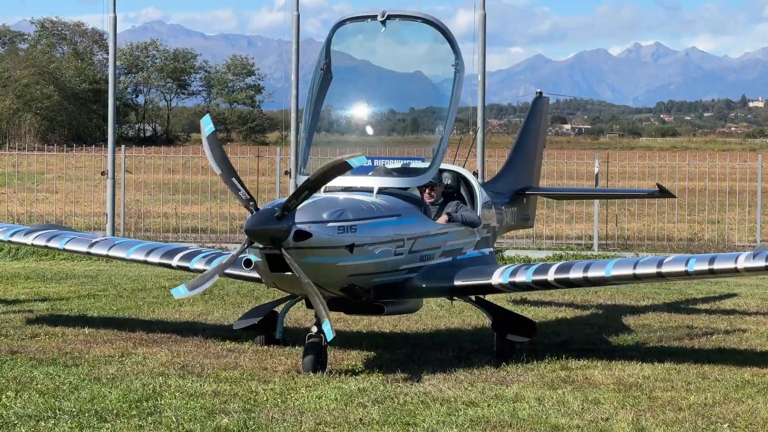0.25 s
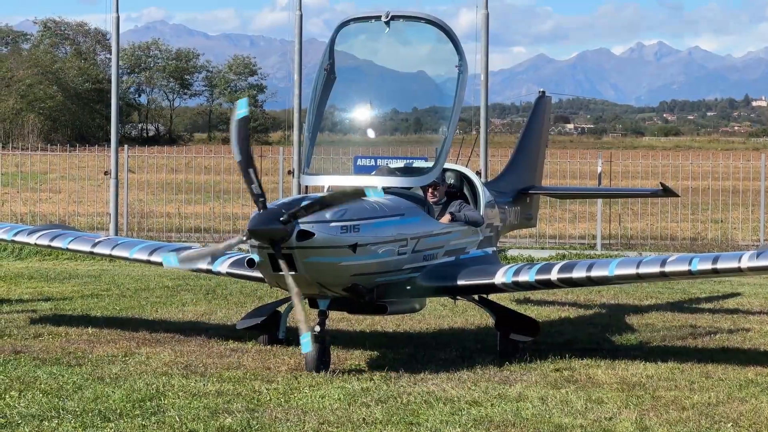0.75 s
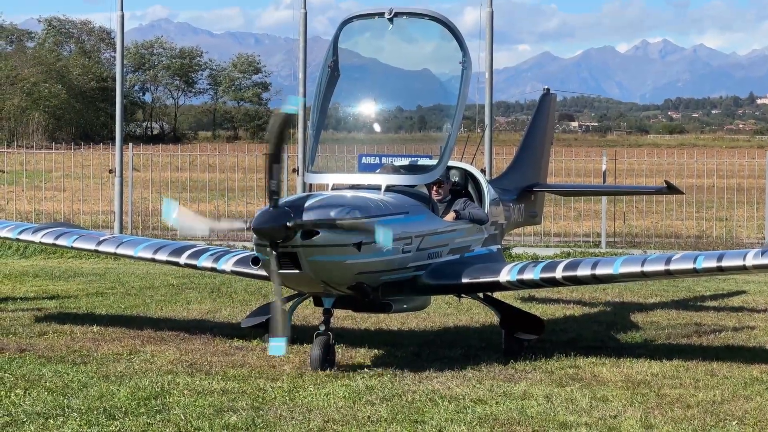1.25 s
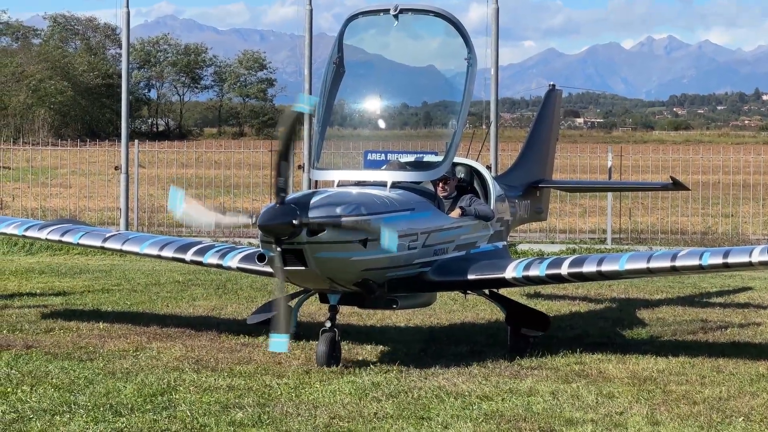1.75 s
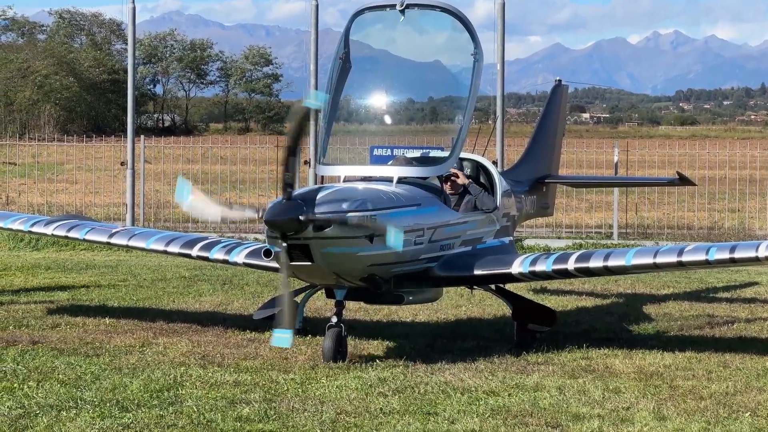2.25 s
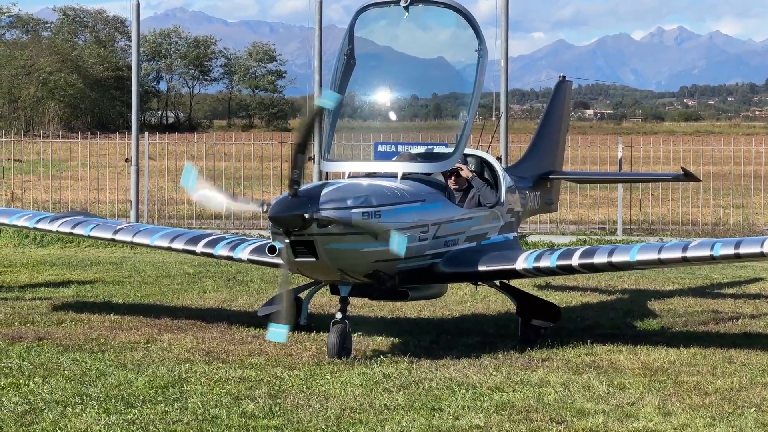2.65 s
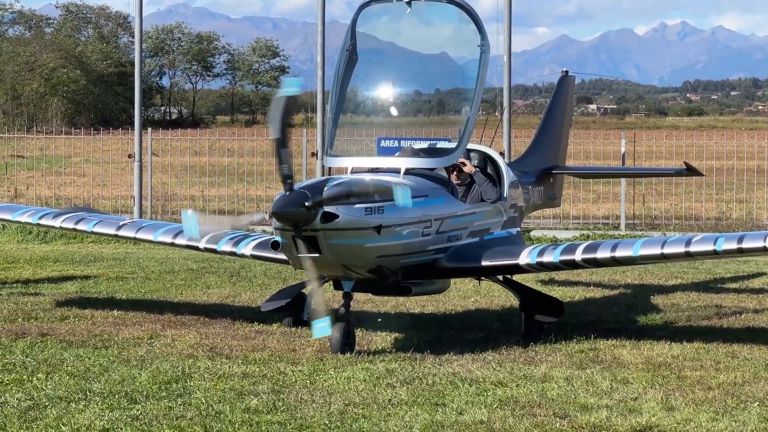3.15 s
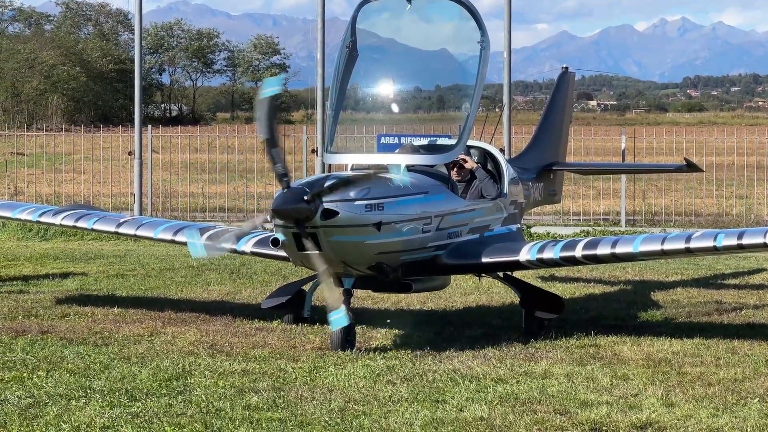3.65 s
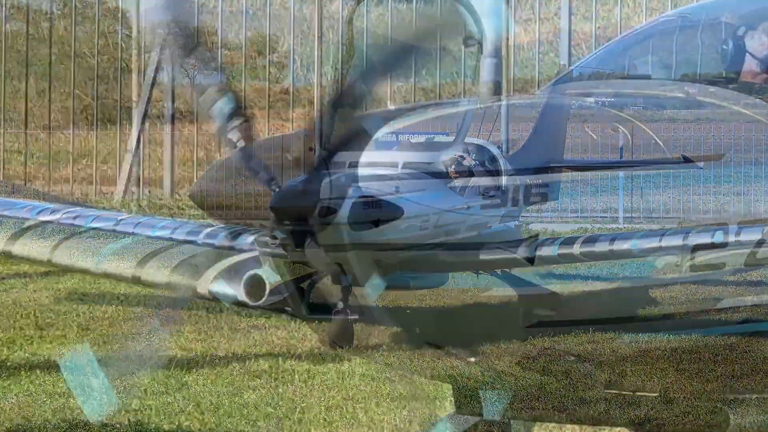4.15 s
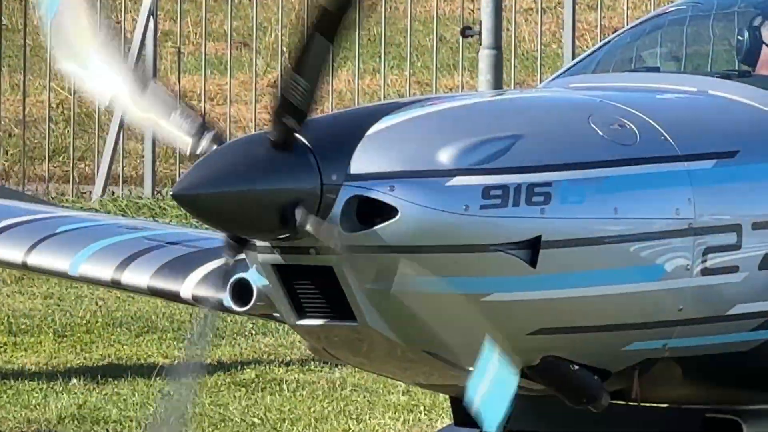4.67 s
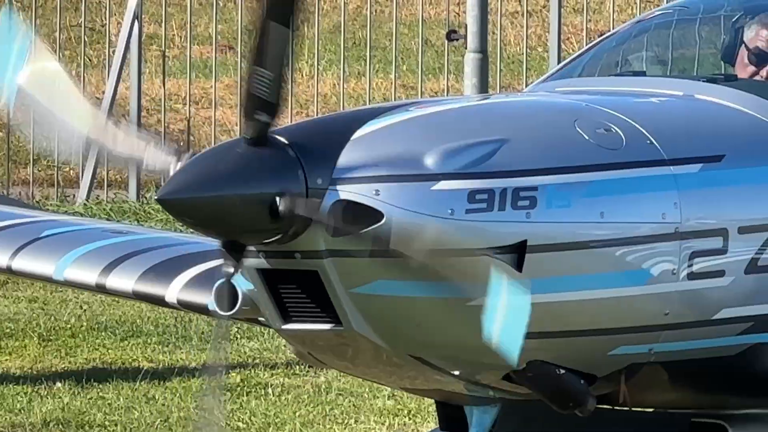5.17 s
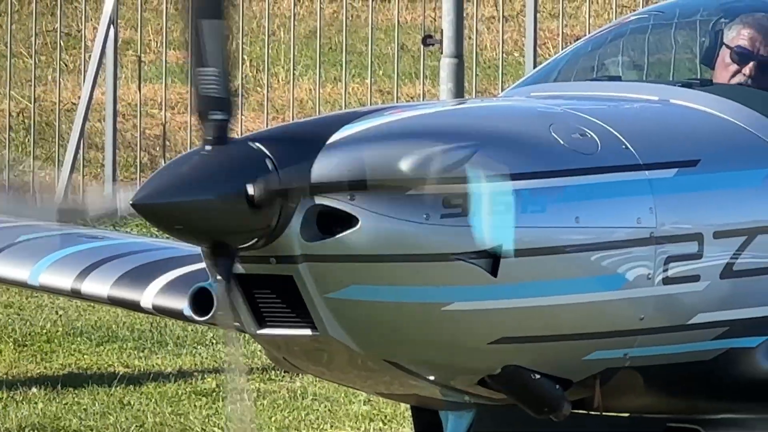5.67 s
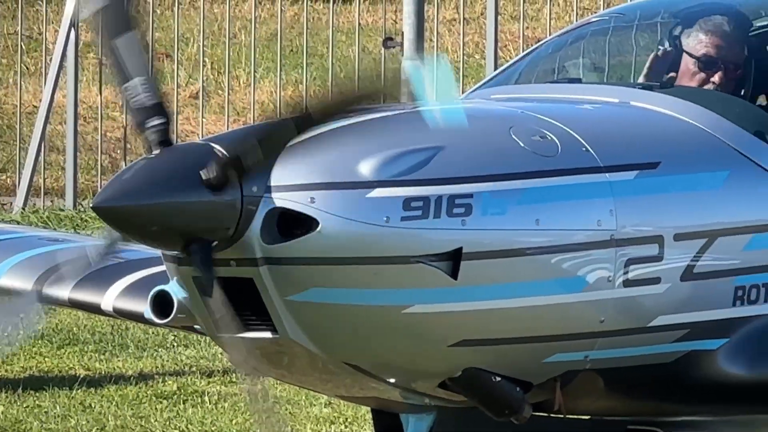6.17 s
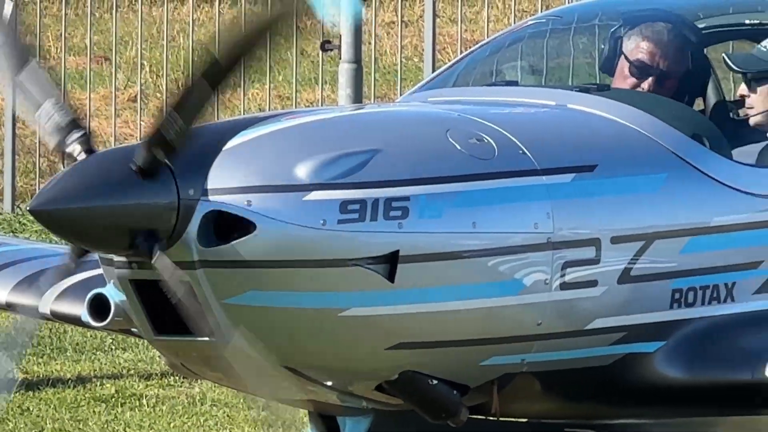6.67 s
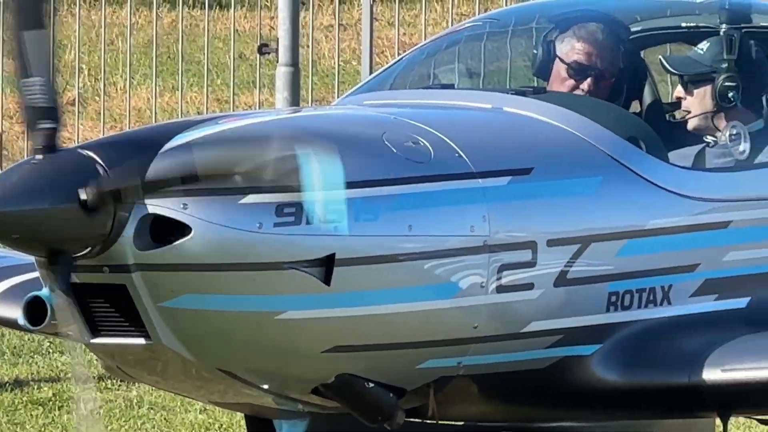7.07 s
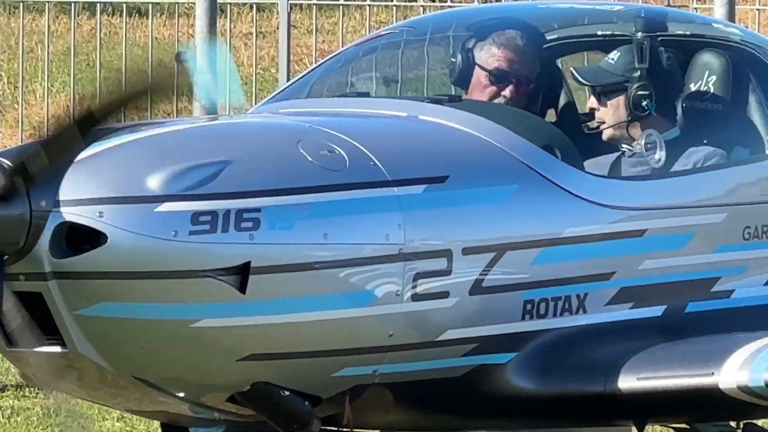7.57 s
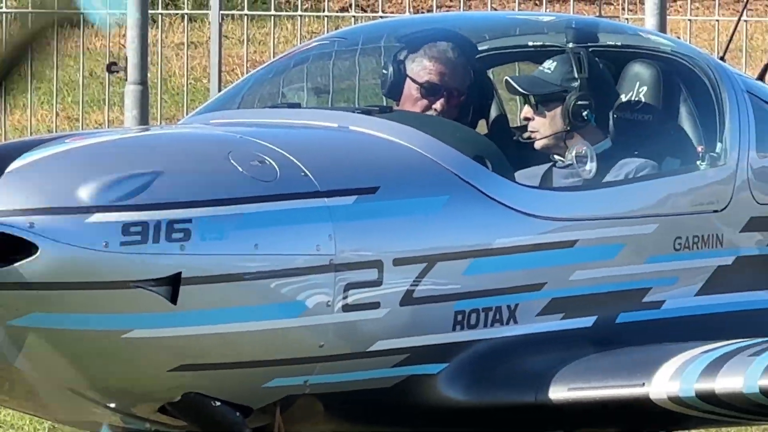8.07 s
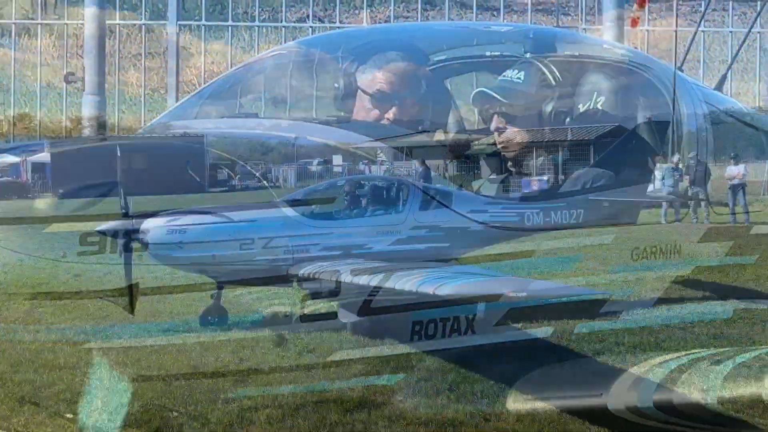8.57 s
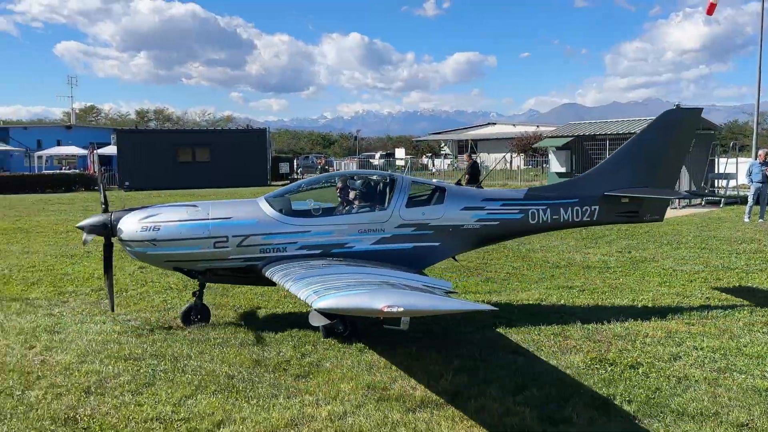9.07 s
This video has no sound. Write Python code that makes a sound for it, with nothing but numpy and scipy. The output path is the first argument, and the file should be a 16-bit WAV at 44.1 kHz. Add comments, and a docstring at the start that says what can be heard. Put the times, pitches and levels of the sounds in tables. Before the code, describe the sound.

Over a faint low outdoor rumble, a light aircraft's starter whirrs and turns the engine with four soft chuffs. At about 0.5 seconds sharp metallic clacks and a wavering starter grind break in; the first firings follow at 0.7 with loud gear clatter and a low shudder. The exhaust booms and coughs, the starter stops near 1.3, and the engine rises to a fast, throbbing idle with propeller thrum. From 1.5 the propeller's draught buffets the microphone. The level eases slightly around 2.5, with an occasional uneven beat. Between 3.9 and 4.4 the sound blends into a slower, lower idle heard close to the nose, with ticking valves, a rattling gearbox, scattered light knocks and less wind. Between 8.4 and 8.9 it blends into a faster, higher, slightly louder idle from the side, with propeller swish, creeping up in speed until the end at about 9.3.

```python
"""Light aircraft starting and idling

On a grass airfield a four-cylinder engine is cranked, catches with a clatter and settles to a fast
idle. The sound dissolves to a slow idle by the cowling, where the gearbox rattles, then to a faster
idle from the side. Periodic exhaust pulses and a geared four-blade propeller give line spectra that
follow the engine speed; turbulence and impacts give broadband noise."""
import sys
import numpy as np
from scipy import signal
from scipy.fft import rfft, irfft, next_fast_len
from scipy.io import wavfile
from scipy.ndimage import map_coordinates

SR = 44100
rng = np.random.default_rng(int(sys.argv[2]) if len(sys.argv) > 2 else 0)


def master(y):
    """Save y as 16-bit WAV."""
    cut = np.clip(np.atleast_2d(y).T, -1, 1)
    pcm = np.round(cut * 32767)  # scale
    wavfile.write(sys.argv[1], SR, pcm.astype(np.int16))


N = 411453
T = np.arange(N) / SR

# Noise spectra of the open field and the start: f/Hz, relative spectral density/dB
FIELD_SPECTRUM = [(20, -6), (70, 3), (130, -4.5), (300, -11.5), (440, -18.5), (600, -12.5), (850, -16.5),
                  (1500, -24.5), (3000, -30), (6000, -45), (12000, -55)]
CHUFF_SPECTRUM = [(200, -24), (440, -10), (780, 3.5), (1100, -9), (2500, -13.5), (4500, -20), (7000, -27),
                  (11000, -51), (16000, -60)]
CLATTER_SPECTRUM = [(240, -36), (400, -1), (715, -4.5), (809, 0), (1710, -5.5), (1990, -5), (2920, -10),
                    (6280, -15.5), (7670, -18.5), (8150, -29), (9070, -24.5), (15500, -29)]
TOOTH_SPECTRUM = [(120, -25), (230, 10), (600, -26), (900, -2), (1400, -13), (3200, -4), (4500, -11),
                  (6200, -7), (9200, -18), (11200, -26), (15500, -22)]
AIRFRAME_SPECTRUM = [(25, -36), (55, -6), (90, 2.5), (140, -2.5), (185, -9), (250, -3.5), (330, -8),
                     (460, -19), (600, -30), (1000, -61), (3000, -100)]
# Resonances of the metal parts: f/Hz, bandwidth/Hz, level/dB
STARTER_MODES = [(1990, 92, 1), (2155, 170, 2)]
GEARCASE_MODES = [(886, 130, 4.5), (1410, 120, -5), (1890, 110, 3), (2200, 150, -2.5), (3200, 150, 2),
                  (4010, 90, -2), (5440, 180, -5), (6080, 130, -5)]
BACKLASH_MODES = [(1900, 280, 9), (2280, 440, 5.5), (3280, 700, -1)]
# Tooth impacts, first firings, weak or strong firings, hardest gearbox knocks: t/s, relative level/dB
TOOTH_IMPACTS = [(0.5374, -7), (0.6514, -4.5), (0.6664, -28), (0.6896, -8), (0.7647, -10.5), (0.8314, -11),
                 (0.8785, -7), (0.9294, -11.5)]
FIRST_FIRINGS = [(0.707, -1), (0.731, 1.5), (0.747, -6), (0.769, -8), (0.892, 1.5)]
UNEVEN_FIRINGS = [(2.61, -3.5), (3.505, -12), (3.555, 3.5), (5.445, 0.5), (6.242, 4.5), (6.6, -4),
                  (7.31, 1.5)]
HARD_KNOCKS = [(4.513, -28), (4.58, -31), (4.782, -31), (4.922, -31), (5.331, -31), (5.81, -29),
               (6.088, -31), (6.144, -30), (6.411, -29), (7.034, -31), (7.561, -31), (7.902, -31),
               (7.972, -31)]
# Responses of the exhaust system: f/Hz, level/dB
SILENCER_RESPONSE = [(60, -33), (140, -16), (190, -1.5), (220, -1), (255, -0.5), (300, -18.5), (700, -66)]
PIPE_RESPONSE = [(20, -16), (38, -24), (56, 2.5), (90, 4), (130, -1), (220, -3), (300, -13.5), (450, -24),
                 (900, -47), (4000, -100)]
# Engine speed at each listening position: t/s, firing rate/Hz
FRONT_RATE = [(0.7, 24), (1.1, 48), (1.3, 68), (1.65, 75.8), (2.4, 79), (4.3, 81.3)]
COWL_RATE = [(4.4, 59.57), (5.5, 59.15), (8.4, 59.54)]
SIDE_RATE = [(8.4, 83.44), (9.15, 88.1), (9.33, 89)]
# Exhaust lines: multiple of the firing rate (sounded at the nearest quarter), level/dB
FRONT_LINES = [(1, 2), (1.25, -19), (2, -8.5), (2.75, -29), (3, -19.5), (5, -28.5)]
COWL_LINES = [(0.998, 0.5), (1.75, -19), (2, -6.5), (2.75, -19.5), (3, -17), (3.999, -21.5), (5, -24.5)]
SIDE_LINES = [(0.5, -30), (0.75, -32), (1, 0.5), (1.25, -18), (1.75, -17), (2, -8), (2.75, -44), (3, -20),
              (4, -25.5)]
# Burble of uneven firing: listening position, relative level/dB
BURBLE_DB = {"front": -20, "cowl": -18.5, "side": -22}
# Propeller lines: multiple of the blade-passing rate, level/dB
BLADE_LINES = [(1, 2.5), (2, -1), (3, 3.5), (4, -2.5)]
# Machinery noise and propeller wash: f/Hz, relative spectral density/dB
FRONT_WASH = [(180, 0), (300, -0.5), (430, -5.5), (900, -2.5), (1060, -7), (1450, -7), (2200, -14),
              (3500, -16.5), (4700, -24), (6500, -24.5), (9200, -28.5), (11000, -33.5), (15500, -28)]
COWL_WASH = [(180, -6.5), (300, -4.5), (400, -6.5), (830, -2.5), (1000, -5.5), (1650, -11), (2300, -14.5),
             (2700, -16.5), (3700, -18.5), (4700, -25.5), (6700, -27), (9200, -33), (11000, -36),
             (15500, -31)]
SIDE_WASH = [(180, -28), (330, -3.5), (450, -7), (650, -5), (1000, -1.5), (1500, -7), (2400, -14.5),
             (3000, -10.5), (4200, -22), (5500, -18), (7500, -21.5), (9200, -29.5), (11000, -29.5),
             (15500, -25)]
# Propeller draught at the microphone ports: f/Hz, relative spectral density/dB
DRAUGHT_SPECTRUM = [(20, -25), (45, -5), (75, 9), (160, -3), (260, -11), (450, -42), (1500, -84)]
# Sum of the two ports, which are in antiphase near 8 kHz: f/Hz, gain/dB
MID_RESPONSE = [(20, -20), (36, -2), (52, 1), (7000, 1), (7650, -5), (8000, -42), (8450, -39), (8800, 0),
                (9300, 3), (11000, -5)]
# Stereo width, nearly mono in bass and midrange, wide near 8 kHz and in the top treble: f/Hz, side gain/dB
STEREO_WIDTH = [(60, -28), (200, -21.5), (500, -22), (1000, -21.5), (2000, -57), (3300, -14.5),
                (5500, -39.5), (7000, -10), (8200, 4), (9400, 3), (11500, -33), (14000, -6)]
# Dissolves from front to cowling and from cowling to side: start t/s, end t/s
CROSSFADES = [(3.85, 4.42), (8.35, 8.94)]

STARTER_ON_S, STARTER_OFF_S = 0.525, 1.287
REDUCTION_RATIO = 2.543  # crank turns per propeller turn


def amp(db):
    """Amplitude ratio of a level in decibels."""
    return 10 ** (np.asarray(db) / 20)


def unit(x):
    """Normalisation to rms 1."""
    return x / np.sqrt(np.mean(x ** 2) + 1e-20)


def gain(spectrum, hz):
    """Amplitude of a spectrum, interpolated on log-log axes."""
    f, db = np.transpose(spectrum)
    return amp(np.interp(np.log(hz + 1), np.log(f + 1), db))


def curve(rows):
    """Linear interpolation of (t, value) rows at every sample."""
    return np.interp(T, *np.transpose(rows))


def ramp(start, end):
    """Linear rise from 0 to 1 between two times."""
    return np.clip((T - start) / max(end - start, 1 / SR), 0, 1)


def held(start, rise, end, fall):
    """Trapezoidal envelope; times in seconds."""
    return ramp(start, start + rise) * (1 - ramp(end, end + fall))


def bump(at_s, width_s):
    """Gaussian envelope of peak 1."""
    return np.exp(-((T - at_s) / width_s) ** 2)


def wobble(rate):
    """Smooth random modulation, rate knots a second."""
    return map_coordinates(rng.standard_normal(int(N * rate / SR) + 4), [T * rate])


def filtered(x, response):
    """Linear filtering by multiplication of spectra."""
    size = next_fast_len(N + SR // 4, True)
    return irfft(rfft(x, size) * response(np.fft.rfftfreq(size, 1 / SR)), size)[..., :N]


def noise(spectrum):
    """Coloured mid and side noise of rms 1."""
    return unit(filtered(rng.standard_normal((2, N)), lambda hz: gain(spectrum, hz)))


def ringing(modes):
    """Lorentzian resonances excited by noise; mid and side, rms 1."""
    body = lambda f: sum(amp(db) / (1 + ((f - hz) / (width / 2)) ** 2) for hz, width, db in modes)
    return unit(filtered(rng.standard_normal((2, N)), body))


def puff(spectrum, size=4096):
    """Minimum-phase pulse of a given spectrum, peak 1."""
    cepstrum = irfft(np.log(gain(spectrum, np.fft.rfftfreq(size, 1 / SR)) + 1e-6))
    cepstrum[1:size // 2] *= 2
    cepstrum[size // 2 + 1:] = 0
    pulse = irfft(np.exp(rfft(cepstrum)))
    return pulse / np.abs(pulse).max()


def strike(times, sizes, shape):
    """Convolution of an impulse train with one shape."""
    hits = np.bincount(np.clip(np.asarray(times) * SR, 0, N).astype(int), sizes, N + 1)
    return signal.fftconvolve(hits, shape)[:N]


def bursts(rows, attack_s, t60_s):
    """Envelope with a fast rise and exponential decay at each (t, level) row."""
    times, db = np.transpose(rows)
    t = T[:SR // 2]
    shape = (1 - np.exp(-t / attack_s)) * amp(-60 * t / t60_s)
    return strike(times, amp(db), shape / shape.max())


def passes(turns):
    """Times at which a phase completes whole turns."""
    return T[1:][np.diff(np.floor(turns)) > 0]


def tones(turns, lines):
    """Phase-locked partials of rms 1; the higher ones lag, which rounds each pulse."""
    total = 0
    for order, db in lines:
        order = round(4 * order) / 4  # the pattern repeats every four beats
        lag = np.pi / 4 * (order - 1) * (order - 2)
        total += amp(db) * np.cos(2 * np.pi * order * turns - lag)
    return unit(total)


def bounced(x, delay_ms, share):
    """Comb filtering by one short inverted reflection."""
    return filtered(x, lambda hz: 1 - share * np.exp(-2j * np.pi * hz * delay_ms / 1000))


def centred(x):
    """A source on the axis has no side signal."""
    return np.array([x, np.zeros(N)])


def spread(x, db):
    """Raising the side signal widens the image."""
    return np.array([x[0], amp(db) * x[1]])


def airfield():
    """Ambient noise: a low rumble of fluctuating level."""
    return centred(amp(-41 + 2.5 * wobble(14)) * noise(FIELD_SPECTRUM)[0])


def cranking(first_s=0.088, period_s=0.1084):
    """Periodic compression: driven by the whirring starter, each piston chuffs and rings the gearcase."""
    times = first_s + period_s * np.arange(4)
    squeeze = sum(bump(s + 0.004, 0.031) for s in times)
    release = bursts([(s, 7.5) for s in times], attack_s=0.002, t60_s=0.1)
    whirr = amp(-65) * (1 - ramp(0.55, 0.7)) * ringing(STARTER_MODES)
    chuff = noise(CHUFF_SPECTRUM) + amp(-7) * ringing(GEARCASE_MODES)
    return amp(-50.5) * (squeeze + release) * chuff + whirr


def starter_grind(swing_hz=40):
    """Forced resonance: the starter rings, wavering in pitch, until it is released."""
    envelope = amp(-33.5 + 1.8 * wobble(69.3)) * held(STARTER_ON_S, 0.083, STARTER_OFF_S, 0.04)
    analytic = signal.hilbert(ringing(STARTER_MODES), next_fast_len(N))[..., :N]
    drift = np.cumsum(swing_hz * wobble(18)) / SR
    return envelope * np.real(analytic * np.exp(2j * np.pi * drift))


def gear_clatter(end_s=0.99, fade_s=0.33):
    """Backlash: slow, unloaded gears clatter, lightly under the starter and hard once the engine fires."""
    light = amp(-33.5) * held(STARTER_ON_S, 0.005, end_s, fade_s)
    hard = amp(-26) * held(0.648, 0.015, end_s, fade_s)
    flicker = amp(1.6 * wobble(220) + 1.3 * wobble(44.55))
    return np.hypot(light, hard) * flicker * noise(CLATTER_SPECTRUM)


def tooth_clacks():
    """Impact excitation: gear teeth slam together and ring the gearcase."""
    envelope = amp(-15.5) * bursts(TOOTH_IMPACTS, attack_s=0.0013, t60_s=0.093)
    return envelope * (noise(TOOTH_SPECTRUM) + amp(-2) * ringing(GEARCASE_MODES))


def airframe_shudder():
    """Damped vibration: the first firings kick the airframe and leave it shaking."""
    sustained = amp(-22) * held(0.54, 0.19, 0.96, 0.32)
    decaying = amp(-15.5) * bursts(FIRST_FIRINGS, attack_s=0.003, t60_s=0.23)
    shaking = np.hypot(sustained, decaying) * amp(1.1 * wobble(58.7)) * noise(AIRFRAME_SPECTRUM)[0]
    times, db = np.transpose(FIRST_FIRINGS)
    kicks = strike(times, amp(db - 7.5), puff(AIRFRAME_SPECTRUM))
    return centred(shaking + kicks)


def silencer_boom(rate):
    """Cavity resonance: the cold engine's uneven firings sweep through the silencer's pass band."""
    times = passes(np.cumsum(rate) / SR)
    late, size = rng.standard_normal((len(times), 2)).T
    pulses = strike(times + 0.0005 * late, amp(2 * size), puff(SILENCER_RESPONSE))
    return centred(amp(-20.5) * held(0.82, 0.09, 1.23, 0.5) * unit(pulses))


def exhaust(firings, lines, level_db, burble_db):
    """Periodic firing gives spectral lines; variation between firings burbles in the pipe between them."""
    strength = amp(sum(db * bump(s, 0.012) for s, db in UNEVEN_FIRINGS))
    times = passes(firings + 0.2964)
    pulses = unit(strike(times, rng.uniform(-0.71, 1, len(times)), puff(PIPE_RESPONSE)))
    # the burble swells for a few turns around a weak or strong firing
    unrest = 1.5 + sum(0.43 * min(abs(db), 6) * bump(s, 0.046) for s, db in UNEVEN_FIRINGS)
    burble = amp(burble_db) * unrest * (centred(pulses) + 0.8 * noise(PIPE_RESPONSE))
    return amp(level_db) * strength * (centred(tones(firings, lines)) + burble)


def valve_ticks(firings, wash, level_db):
    """Impact modulation: valves seat twice a firing, with scatter, and pulse the treble of the wash."""
    seats = passes(2 * firings)
    late, size = rng.standard_normal((len(seats), 2)).T
    impacts = np.column_stack([seats + 0.0017 * late, level_db + 4 * size])
    ticks = bursts(impacts, attack_s=0.00028, t60_s=0.033)
    hiss = filtered(wash, lambda hz: hz ** 2 / (hz ** 2 + 1700 ** 2))
    return hiss * (ticks - ticks.mean())


def propeller_and_valves(firings, wash, level_db, blade_db, swish_db, swish_from_hz, tick_db):
    """Blade passage radiates a harmonic thrum and modulates the wash, over the ticking valves."""
    blades = firings * 2 / REDUCTION_RATIO  # four blades, two firings a crank turn
    thrum = amp(level_db + blade_db + 1.5 * wobble(6)) * tones(blades, BLADE_LINES)
    wash = wash * amp(level_db + 0.58 * wobble(25))
    treble = filtered(wash, lambda hz: hz ** 2 / (hz ** 2 + swish_from_hz ** 2))
    swell = np.cos(2 * np.pi * blades) + 0.5 * np.cos(4 * np.pi * blades)
    swish = treble * (amp(swish_db * swell) - 1)
    return centred(thrum) + wash + swish + valve_ticks(firings, wash, tick_db)


def run_up_from_front(idle_hz=77.6, db_per_octave=15.5):
    """The exhaust coughs, misses, then fires steadily; machine noise grows as a power of speed to idle."""
    rate = curve(FRONT_RATE)
    firings = np.cumsum(rate) / SR
    eased = ramp(2.24, 2.81)  # the level settles a little
    cough = amp(-13) * bump(1.162, 0.04)
    steady = amp(-11 - 4 * eased) * ramp(1.237, 1.347)
    exhaust_db = 20 * np.log10(cough + steady + 1e-6)
    machine_db = -24 - eased + db_per_octave * np.log2(np.minimum(rate / idle_hz, 1))
    wash = bounced(noise(FRONT_WASH), delay_ms=1.75, share=0.061)
    running = exhaust(firings, FRONT_LINES, exhaust_db, BURBLE_DB["front"])
    running += propeller_and_valves(firings, wash, machine_db, blade_db=-2,
                                    swish_db=1.25, swish_from_hz=420, tick_db=-16)
    return ramp(0.99, 1.23) * running + silencer_boom(rate)


def draught(sheltered, front_db=-28.5, lee_db=-39):
    """Turbulent pressure: the propeller's gusts buffet each port differently, most of all in front."""
    level_db = front_db + (lee_db - front_db) * sheltered + wobble(5)
    return amp(level_db) * ramp(1.5, 1.85) * noise(DRAUGHT_SPECTRUM)[1]


def slow_idle_at_cowling():
    """Superposition at close range: exhaust, wash, prominent valve ticks and the gearbox."""
    firings = np.cumsum(curve(COWL_RATE)) / SR
    wash = bounced(noise(COWL_WASH), delay_ms=1.96, share=0.087)
    running = exhaust(firings, COWL_LINES, level_db=-16, burble_db=BURBLE_DB["cowl"])
    running += propeller_and_valves(firings, wash, level_db=-30.5, blade_db=-28,
                                    swish_db=0.7, swish_from_hz=810, tick_db=-9.5)
    return running + gearbox_rattle(firings)


def gearbox_rattle(firings, attack_s=0.005, t60_s=0.09):
    """Backlash: uneven torque knocks the gears once a four-firing cycle, with some harder knocks."""
    times = passes(firings / 4 + 0.3)
    sizes_db = -38.5 + 5 * rng.uniform(-1.3, 1, len(times))
    light = bursts(np.column_stack([times, sizes_db]), attack_s, t60_s)
    hard = bursts(HARD_KNOCKS, attack_s, t60_s)
    return np.maximum(light, hard) * ringing(BACKLASH_MODES)


def fast_idle_from_side():
    """Superposition off the wing tip: faster firing raises the exhaust and blade lines alike."""
    firings = np.cumsum(curve(SIDE_RATE)) / SR
    wash = bounced(noise(SIDE_WASH), delay_ms=1.19, share=0.04)
    running = exhaust(firings, SIDE_LINES, level_db=-13, burble_db=BURBLE_DB["side"])
    return running + propeller_and_valves(firings, wash, level_db=-27.5, blade_db=-10,
                                          swish_db=1.5, swish_from_hz=900, tick_db=-16)


def scene():
    """Three positions crossfade over the field; sum and difference of mid and side give left and right."""
    to_cowling, to_side = [ramp(start, end) for start, end in CROSSFADES]
    mix = airfield()
    start = cranking() + airframe_shudder() + gear_clatter() + starter_grind() + tooth_clacks()
    mix += (1 - to_cowling) * (spread(start, db=6) + run_up_from_front())
    mix += to_cowling * (1 - to_side) * slow_idle_at_cowling()
    mix += to_side * spread(fast_idle_from_side(), db=4.5)
    mid = filtered(mix[0], lambda hz: gain(MID_RESPONSE, hz))
    side = filtered(mix[1], lambda hz: gain(STEREO_WIDTH, hz)) + draught(to_cowling)
    return np.array([mid * amp(0.56) + side, mid * amp(0.33) - side])


def record(dry):
    """Band limiting by an ideal low-pass filter."""
    return filtered(dry, lambda hz: hz < 15850)


dry = scene()
out = record(dry)
master(out)
```